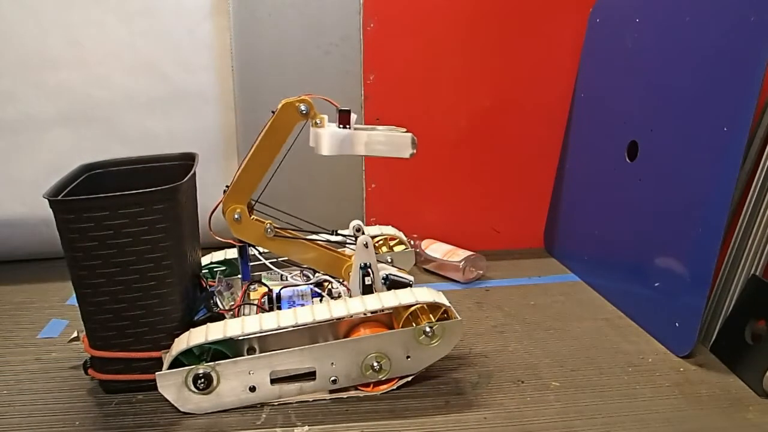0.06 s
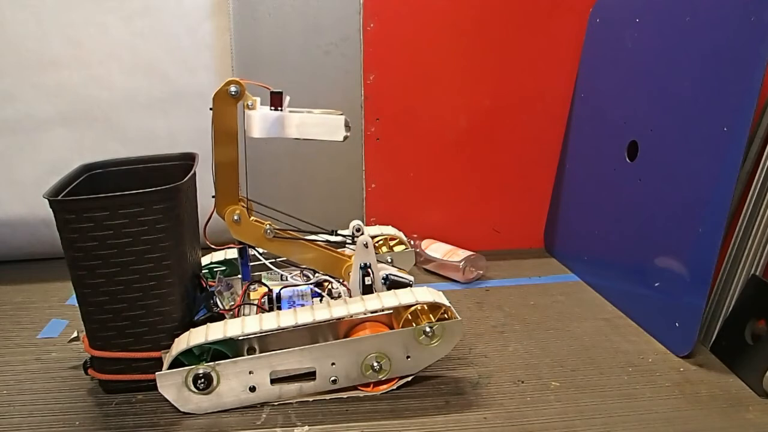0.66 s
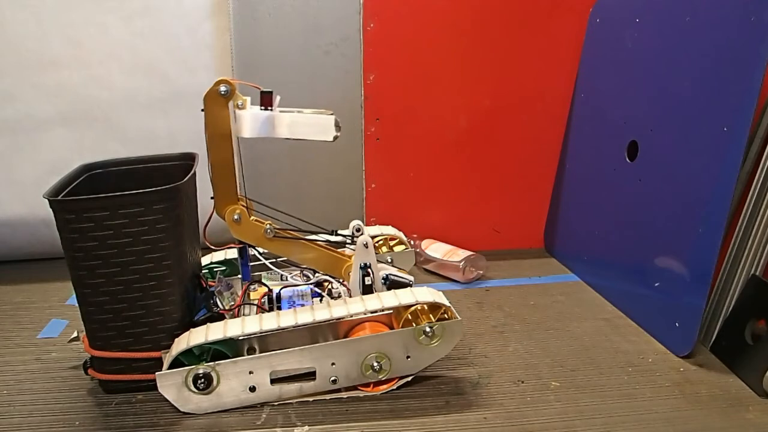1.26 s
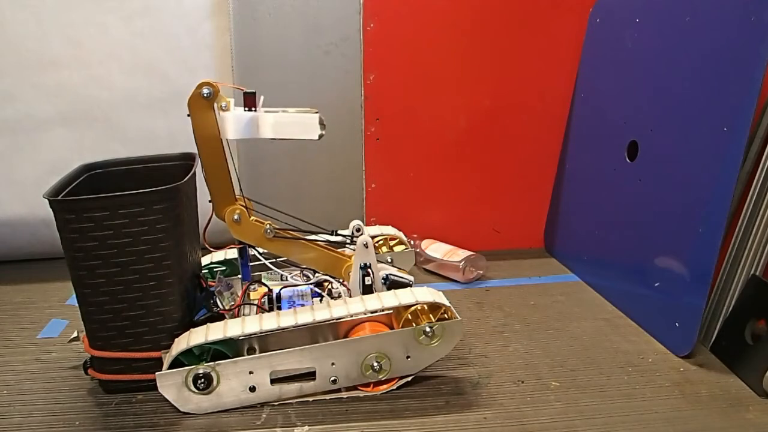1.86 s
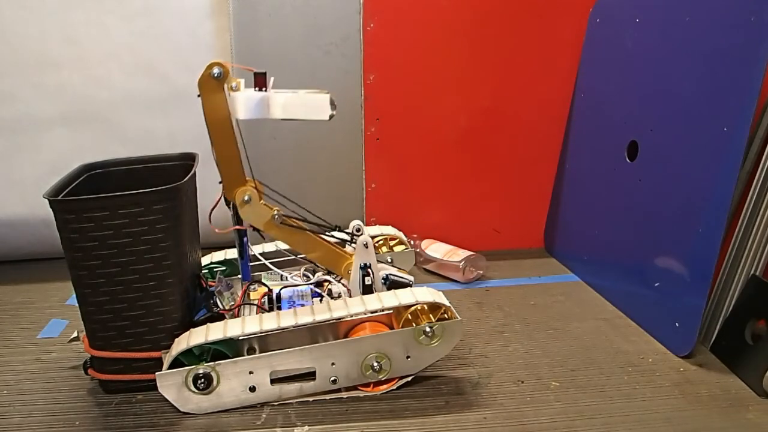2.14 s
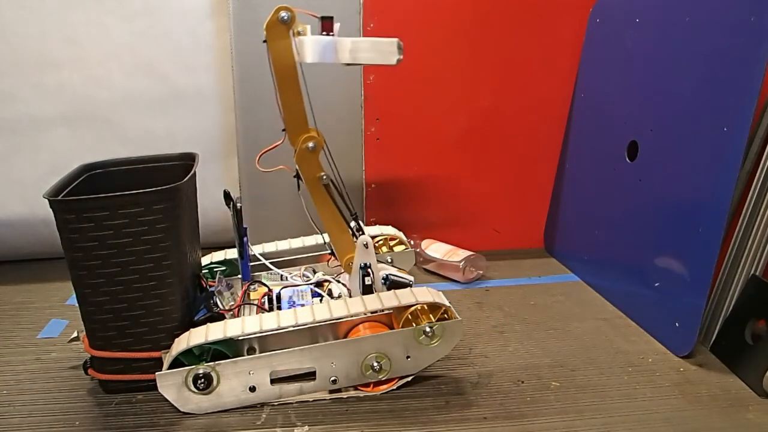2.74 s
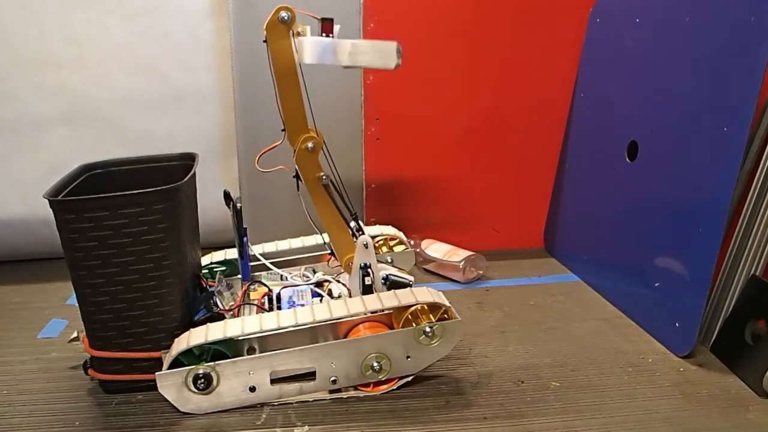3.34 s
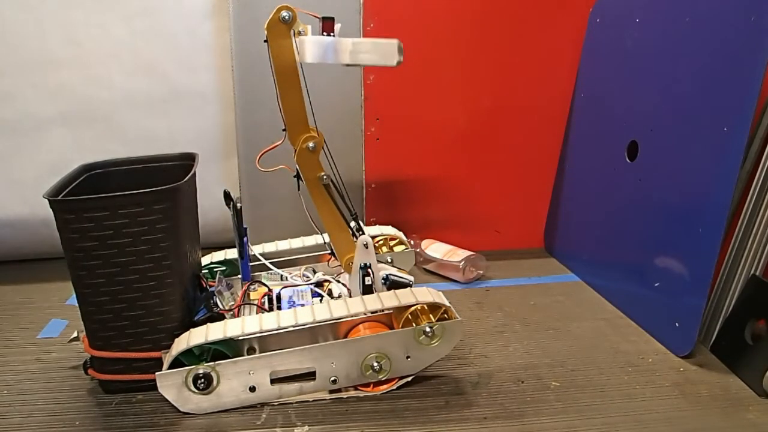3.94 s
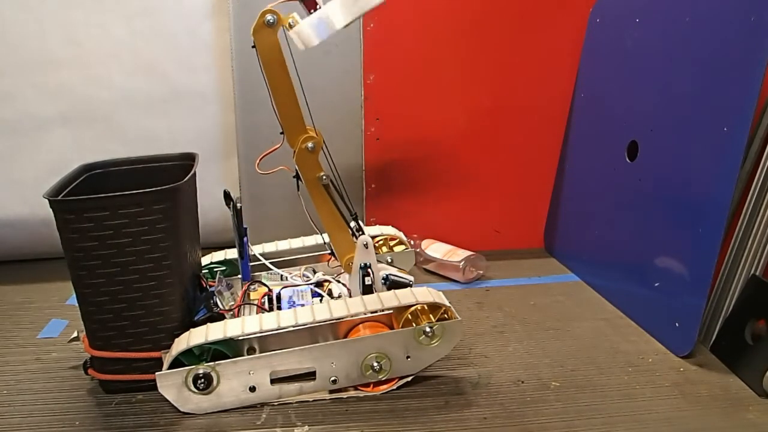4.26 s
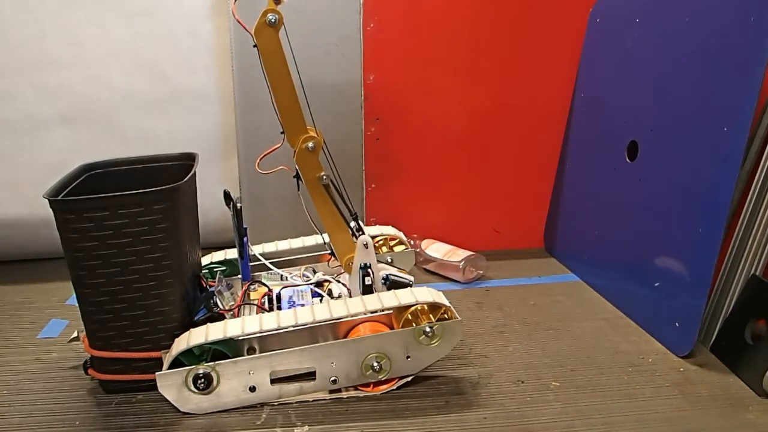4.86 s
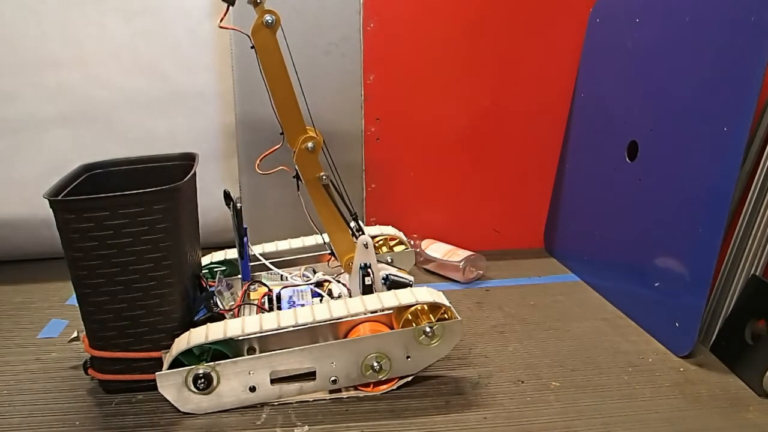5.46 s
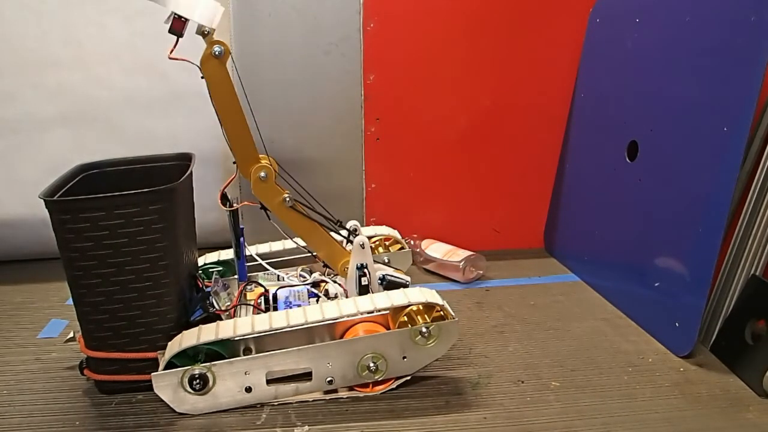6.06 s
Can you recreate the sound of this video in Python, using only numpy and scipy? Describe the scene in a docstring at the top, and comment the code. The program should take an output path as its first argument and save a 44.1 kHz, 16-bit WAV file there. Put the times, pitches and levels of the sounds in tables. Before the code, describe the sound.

A little robot arm moves with brief, high, buzzing servo chirps, a wavering gear whine and sharp clicks over a faint fan.

```python
"""Hobby servos (small geared motors) move the arm of a little robot on a table, close to a phone.
Each step kicks a motor: its gear teeth rattle and make the servo case ring near 4.8 kHz. The shoulder
and elbow move in short steps; the wrist runs for about a second with a wavering gear whine.
Joints knock as their slack is taken up; the body groans under load and hums low as the wrist runs.
The small room adds a short echo, and a fan hums behind it all."""
import sys
import numpy as np
from scipy import signal
from scipy.fft import rfft, irfft, next_fast_len
from scipy.io import wavfile
from scipy.ndimage import uniform_filter1d

SR = 44100
rng = np.random.default_rng(int(sys.argv[2]) if len(sys.argv) > 2 else 0)


def transcribe(signal):
    """Save signal, clipped to [-1, 1], as a 16-bit WAV file at the path in sys.argv[1]."""
    frames = np.atleast_2d(signal).T
    limited = np.clip(frames, -1, 1)
    pcm = np.round(limited * 32767).astype(np.int16)
    wavfile.write(sys.argv[1], SR, pcm)


N = 273861
T = np.arange(N) / SR
WRIST_START_S, WRIST_END_S = 3.8, 5.05


# How strongly the wrist's case rings as the motor works: t/s, level/dB
WRIST_RING_LEVELS = [(3.8, -39), (3.816, -32), (3.902, -45), (3.908, -36.5), (4.078, -29), (4.8, -25.5),
                     (5.024, -29.5), (5.07, -39)]

def wrist_steps(boost_db, case_hz=4765, length_s=.042, lead_s=.02):
    """Up to about 19 steps a second: in each, a gear tone slides down past the note of the case."""
    out = np.zeros(N)
    for start in wrist_step_times() - lead_s:
        drive = surge(length_s, rise_s=.006, coast_s=.009)
        middle_hz = 1.02 * case_hz * rng.uniform(.985, 1.015)
        tone_hz = sinking_pitch(middle_hz, len(drive), .8 * length_s, fall=.12)
        tone = np.sin(shiver(tone_hz, flutter=.012)) * gain(3 * wander(400, len(drive)))
        flick = resonate(tone, case_hz, width_hz=410)
        teeth = rattle(len(drive), per_s=1200, scatter_db=4)
        ring = case_ring(teeth, 1.012 * case_hz, width_hz=680)
        add(out, start, drive * (flick + .68 * ring))
    return wrist_powered() * gain(curve(WRIST_RING_LEVELS) + boost_db) * out


# How fast the wrist's gear teeth meet, before each step's kick is added: t/s, f/Hz
WRIST_TOOTH_RATES = [(3.8, 2550), (3.88, 2300), (3.93, 2742), (4.0, 2348), (4.11, 3950), (4.19, 2951),
                     (4.26, 3650), (4.36, 2589), (4.425, 3909), (4.47, 2303), (4.62, 2405), (4.675, 4057),
                     (4.72, 3252), (4.8, 3155), (4.85, 2400), (4.92, 3854), (4.985, 2158)]
# Tone colour of the wrist gears' rasp: f/Hz, level/dB
WRIST_RASP_COLOUR = [(40, -60), (200, -32.5), (420, -18.5), (1200, -13.5), (1400, -10), (1520, -7),
                     (1750, -12), (2100, -5), (3050, 3.5), (3750, 2.5), (4050, 1.5), (4600, 5),
                     (6100, -0.5), (7000, -4), (9000, -28.5)]
# Tone colour of their high hiss: f/Hz, level/dB
WRIST_HISS_COLOUR = [(4000, -30), (6000, 0), (6900, -2), (8200, 2), (9500, -1), (11200, -4.5), (12800, -20),
                     (16000, -53)]

def wrist_gears(rasp_db, hiss_db, usual_hz=3000, kick_lead_s=.01398):
    """The wrist's long run: the faster the motor turns, the louder its teeth rasp and hiss."""
    steps = wrist_step_times()
    steps_done = np.interp(T + kick_lead_s, steps, np.arange(len(steps)))
    kicks = 1 + .06 * np.cos(2 * np.pi * steps_done)  # each step swings the speed by 6%
    tooth_hz = curve(WRIST_TOOTH_RATES) * kicks
    speed_db = 20 * np.log10(tooth_hz / usual_hz)
    load = 1 - np.exp(-np.abs(T - WRIST_START_S) / .03)  # the gears take up the load...
    load *= 1 - np.exp(-np.abs(WRIST_END_S - T) / .025)  # ...and let it go
    # the teeth whine more clearly while the motor slows
    slowing = uniform_filter1d(1. * (np.gradient(tooth_hz) < 0), size=400)
    whine = (.42 + .36 * slowing) * gear_whine(tooth_hz, mesh_db=4.5)
    teeth = rattle(N, per_s=2200, scatter_db=2) + whine
    rasp = load * gain(1.5 * speed_db + rasp_db) * unit(colour(teeth, WRIST_RASP_COLOUR))
    hiss = np.sqrt(load) * gain(2.4 * speed_db + hiss_db) * unit(colour(teeth, WRIST_HISS_COLOUR))
    return wrist_powered() * (rasp + hiss)


def wrist_step_times(middle_s=4.434, gap_s=.0512, ease=.00107):
    """The wrist eases in and out, so its steps come closest together in the middle."""
    step = np.arange(-11, 12)
    return middle_s + gap_s * step * (1 + ease * step ** 2)


def wrist_powered():
    """1 while the wrist motor is on, 0 while it is off, with a quick fade between."""
    return uniform_filter1d(1. * ((T > WRIST_START_S) & (T < WRIST_END_S)), size=400)


# Shoulder and elbow steps, plus a few light gripper twitches ringing near 5.3 kHz, and the ring of each: t/s,
# length/s, level/dB, f/Hz
ARM_MOVES = [(0.032, 0.027, -42, 4850), (0.101, 0.061, -37.5, 4830), (0.186, 0.056, -38, 4770),
             (0.27, 0.11, -37, 4910), (1.008, 0.044, -55, 4900), (1.068, 0.099, -45.5, 4830),
             (1.178, 0.059, -47, 4820), (1.259, 0.056, -46.5, 4880), (1.767, 0.033, -48.5, 4840),
             (1.853, 0.038, -35.5, 4760), (2.007, 0.041, -35, 4790), (2.08, 0.062, -38, 4770),
             (2.179, 0.076, -34, 4745), (2.304, 0.038, -46.5, 5080), (2.374, 0.0417, -35.5, 4740),
             (2.447, 0.033, -35, 4740), (2.507, .04, -30, 4746), (2.791, 0.022, -52, 5290),
             (3.205, 0.049, -28.5, 4920), (3.723, 0.046, -47.5, 5300), (5.746, 0.015, -45.5, 5300)]
# Tone colour of their gears' rasp: f/Hz, level/dB
ARM_RASP_COLOUR = [(150, -43), (300, -23), (800, -10), (1500, -7.5), (2050, -1), (3400, 4), (4050, 5.5),
                   (5400, 11.5), (6300, 10), (7200, -1), (11300, -12.5), (12800, -13), (16000, -30)]

def arm_servos(rise_s=.009, usual_step_db=-38.5, usual_rasp_db=-43.5):
    """Short steps: rattling teeth ring the case, and the gears rasp with a slightly sinking whine."""
    out = np.zeros(N)
    for start, length, db, hz in ARM_MOVES:
        drive = surge(length + .003, rise_s, coast_s=.016)
        teeth = rattle(len(drive), per_s=3500, scatter_db=3)
        tooth_hz = sinking_pitch(hz / 2 * rng.uniform(.87, 1.03), len(drive), length, fall=.04)
        whine = gear_whine(tooth_hz, mesh_db=5)
        rasp_db = usual_rasp_db + .88 * (db - usual_step_db)  # louder steps rasp more
        rasp = gain(rasp_db) * unit(colour(teeth + .36 * whine, ARM_RASP_COLOUR))
        ring = gain(db - 2) * case_ring(teeth, hz, width_hz=760)
        add(out, start - rise_s / 2, drive * (ring + rasp))
    return out


def gear_whine(tooth_hz, mesh_db, teeth=4):
    """Meeting teeth make a tone; their unevenness repeats every few teeth and adds tones around it."""
    angle = shiver(tooth_hz / teeth, flutter=.024)
    boost_db = {teeth: mesh_db, 2 * teeth: mesh_db / 2}  # the main tone and its octave stand out
    out = 0
    for multiple in range(teeth // 2, 2 * teeth + 2):
        db = boost_db.get(multiple, 0) + 4 * wander(150, len(angle))
        out += gain(db) * np.sin(multiple * angle + rng.uniform(0, 2 * np.pi))
    return unit(out)


def rattle(size, per_s, scatter_db):
    """Loose parts hit each other at random, some harder than others."""
    hits = (rng.random(size) < per_s / SR) * rng.choice([-1, 1], size)
    strength = gain(scatter_db * np.clip(rng.standard_normal(size), -2, 2))
    return unit(hits * strength)


def case_ring(teeth, hz, width_hz):
    """The servo case rings only close to its own note."""
    return unit(resonate(resonate(teeth, hz, width_hz), hz, width_hz))


def surge(length_s, rise_s, coast_s):
    """Loudness of one push: the motor spins up while driven, then coasts to a stop."""
    t = T[:int((length_s + 10 * coast_s) * SR)]
    return (1 - np.exp(-t / rise_s)) * np.exp(-np.maximum(t - length_s, 0) / coast_s)


def sinking_pitch(hz, size, length_s, fall):
    """A pitch that slides down, passing hz halfway through length_s."""
    return hz * (1 - fall * np.tanh(2 * T[:size] / length_s - 1))


def shiver(hz, flutter):
    """The angle of a turning part whose speed trembles because the teeth fit loosely."""
    return 2 * np.pi * np.cumsum(hz * (1 + flutter * wander(1500, len(hz)))) / SR


# Knocks in the joints: t/s, level/dB, contact time/s, low thud boost/dB
JOINT_KNOCKS = [(1.8713, -28.5, 0.0027, 10), (1.884, -38.5, .003, 17), (2.716, -44, 0.00099, 13),
                (3.0949, -24.5, 0.00086, -13), (3.438, -41.5, 0.0044, -2.5), (3.458, -33, 0.0042, -7),
                (3.466, -31.5, 0.0053, -15), (3.473, -31.5, 0.0025, -12), (3.5587, -37, 0.0039, 12),
                (3.601, -40, 0.0019, 1), (5.3746, -28, 0.0015, -1), (5.804, -48, 0.0022, -10),
                (5.888, -42, 0.0018, -1), (5.909, -29, 0.00078, 2.5), (6.099, -44.5, 0.00038, -12),
                (6.133, -24.5, 0.0016, -4.5), (6.1734, -40.5, .001, -5)]
# The notes at which the arm and its joints ring: f/Hz, width/Hz, level/dB
ARM_NOTES = [(732, 84, -3.5), (950, 170, -5.5), (1260, 190, -4), (1490, 260, -5), (2080, 204, -0.5),
             (2380, 420, 0), (3300, 290, 1), (3270, 430, -0.5), (4740, 330, 3), (5300, 680, 1.5),
             (5920, 520, 1), (7600, 570, -16), (10200, 3300, -16.5)]

def joint_knocks(thud_hz=1230, thud_octaves=.65, usual_contact_s=.0019):
    """Brief gritty hits ring the arm. Each has its own amount of low thud; shorter hits are brighter."""
    out, t = np.zeros(N), T[:SR // 20]
    soft_plastic = signal.butter(2, 12000, fs=SR)
    for start, db, contact_s, thud_db in JOINT_KNOCKS:
        crack_db = -3.5 * np.log2(contact_s / usual_contact_s)  # a longer contact is duller
        ring = 0
        for hz, width, note_db in ARM_NOTES:
            push = rng.standard_normal(len(t)) * np.exp(-t / contact_s)
            thud_share = np.exp(-(np.log2(hz / thud_hz) / thud_octaves) ** 2)
            strength = gain(note_db + thud_db * thud_share + crack_db * (hz > 4100)) * np.sqrt(width)
            bass_cut = signal.butter(2, hz / 2, "high", fs=SR)  # small parts give off little bass
            ring += strength * unit(signal.lfilter(*bass_cut, resonate(push, hz, width)))
        ring = signal.lfilter(*soft_plastic, ring)
        opening_level = np.sqrt(np.mean(ring[:SR // 250] ** 2))  # the first 4 ms
        add(out, start, gain(db) * ring / opening_level)
    return out


# The body's short groans and its one longer hum: t/s, length/s, level/dB
BODY_SOUNDS = [(2.211, 0.036, -61), (2.499, 0.046, -54.5), (2.548, 0.043, -50.5), (4.08, 0.54, -61)]
# The low notes at which the body rings: f/Hz, width/Hz, level/dB
BODY_NOTES = [(305, 14.5, 5.5), (524, 70, -10), (610, 110, -13)]

def body_groans_and_hum():
    """The robot's body groans briefly under load and hums low while the wrist motor runs."""
    out = np.zeros(N)
    for start, length, db in BODY_SOUNDS:
        drive = surge(length, rise_s=.012, coast_s=.016)
        shaking = rattle(len(drive), per_s=590, scatter_db=1.5)
        ring = sum(gain(note_db) * resonate(shaking, hz, width) for hz, width, note_db in BODY_NOTES)
        add(out, start, gain(db) * drive * unit(ring))
    return out


# How much louder the robot is on the right than on the left: f/Hz, level/dB
RIGHT_OVER_LEFT = [(200, 6), (1300, 6), (2400, 5), (4600, 13.5), (5600, 5), (8100, 2.5), (15000, 6.5)]

def room(x, boards_db, tail_db, alike):
    """The table and nearby boards echo at once, the room later; the left side is shaded near 5 kHz."""
    shared_boards, shared_tail = echoes(fade_s=.1, delay_s=.0021), echoes(fade_s=.32, delay_s=.014)
    unlike = np.sqrt(1 - alike ** 2)  # weight of the echoes that only one side hears
    out = []
    for side in (1, -1):  # left, then right
        boards = alike * shared_boards + unlike * echoes(fade_s=.034, delay_s=.002)
        tail = alike * shared_tail + unlike * echoes(fade_s=.48, delay_s=.011)
        heard = x + signal.fftconvolve(x, gain(boards_db) * boards + gain(tail_db) * tail)[:N]
        balance = [(hz, 20 * np.log10(2 / (1 + gain(side * db)))) for hz, db in RIGHT_OVER_LEFT]
        out.append(colour(heard, balance))
    return np.array(out)


def echoes(fade_s, delay_s):
    """A cloud of echoes that starts after delay_s and drops 60 dB in fade_s."""
    t = T[:SR * 2 // 3]
    cloud = rng.standard_normal(len(t)) * gain(-60 * t / fade_s) * (t > delay_s)
    return cloud / np.sqrt(np.sum(cloud ** 2))


# Tone colour of the fan's rushing air, heard with a narrow dip near 4 kHz: f/Hz, level/dB
FAN_AIR_COLOUR = [(25, -36), (50, -25), (90, -8.5), (150, -7), (260, -1), (480, -2), (1000, -3.5),
                  (2100, -8), (3750, -13.5), (4050, -29), (4400, -12), (5000, -10.5), (7000, -12.5),
                  (16000, -18.5)]
# The fan motor's two hum tones: f/Hz, level/dB
FAN_HUM_TONES = [(120, -72.5), (118.76, -78)]

def fan(air_db, left_vs_right_db):
    """Air rushes steadily, and two close motor tones make a slowly throbbing hum."""
    shared = colour(rng.standard_normal(N), FAN_AIR_COLOUR)
    # the two sides are most alike in the bass
    shared = colour(shared, [(100, -6), (300, -8.5), (1000, -10.5), (4000, -11)])
    air = np.array([unit(shared + colour(rng.standard_normal(N), FAN_AIR_COLOUR)) for _ in range(2)])
    air *= gain(air_db + .45 * wander(5.9))
    hum = sum(np.sqrt(2) * gain(db) * np.cos(2 * np.pi * hz * (T - .3)) for hz, db in FAN_HUM_TONES)
    return (air + hum) * gain([[left_vs_right_db / 2], [-left_vs_right_db / 2]])


def gain(db):
    """Turn decibels into a number to multiply by."""
    return 10 ** (np.asarray(db) / 20)


def unit(x):
    """Scale x to an average strength (rms) of 1."""
    return x / np.sqrt(np.mean(x ** 2))


def curve(rows):
    """Join (time, value) points with straight lines."""
    return np.interp(T, *np.transpose(rows))


def add(track, start_s, x):
    """Mix x into the track from start_s on."""
    i = max(int(start_s * SR), 0)
    track[i:i + len(x)] += x[:N - i]


def colour(x, points):
    """Turn the lows and highs of x up or down, following (f/Hz, level/dB) points."""
    hz, db = np.transpose(points)
    size = next_fast_len(len(x))
    f = np.maximum(np.fft.rfftfreq(size, 1 / SR), 1)
    shape = gain(np.interp(np.log(f), np.log(hz), db))
    return irfft(rfft(x, size) * shape, size)[:len(x)]


def resonate(x, hz, width_hz):
    """Let x ring at one note; a smaller width rings longer."""
    return signal.lfilter(*signal.iirpeak(hz, hz / width_hz, fs=SR), x)


def wander(per_s, size=N):
    """A smooth random wobble of typical size 1, with per_s turns a second."""
    hold = max(int(SR / per_s), 1)
    stairs = np.repeat(rng.standard_normal(size // hold + 1), hold)
    return unit(uniform_filter1d(stairs, hold)[:size])


def scene():
    """The robot in its room, with the fan behind."""
    servos = arm_servos() + wrist_gears(rasp_db=-37.5, hiss_db=-46) + wrist_steps(boost_db=1.83)
    robot = servos + body_groans_and_hum() + joint_knocks()
    return room(robot, boards_db=-3.5, tail_db=-7, alike=.69) + fan(air_db=-53.5, left_vs_right_db=-5)


def record(dry):
    """The phone cuts off the treble above 16 kHz."""
    return signal.sosfilt(signal.ellip(10, .2, 70, 16000, fs=SR, output="sos"), dry)


dry = scene()
out = record(dry)
transcribe(out)
```